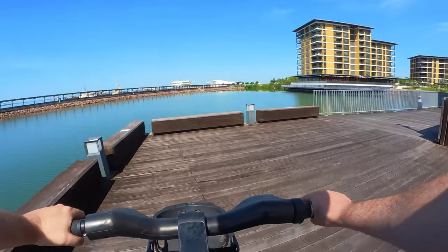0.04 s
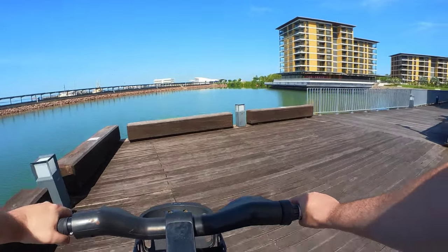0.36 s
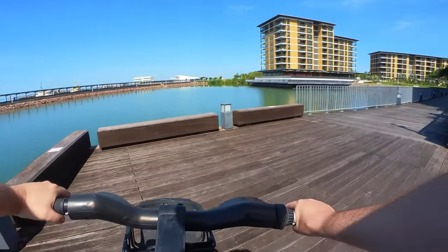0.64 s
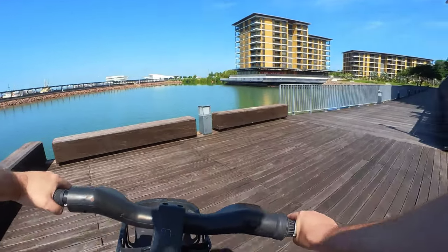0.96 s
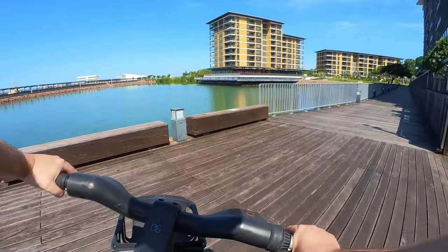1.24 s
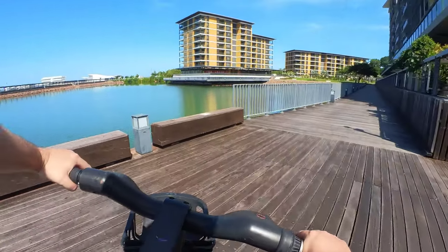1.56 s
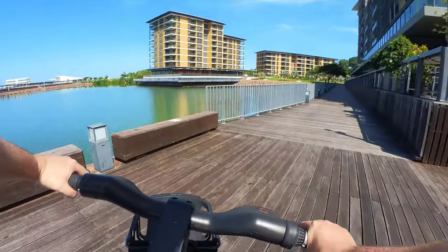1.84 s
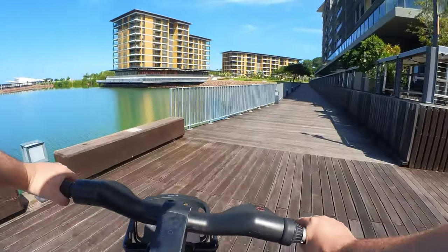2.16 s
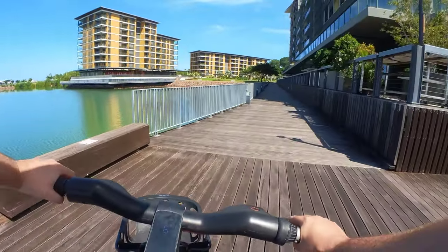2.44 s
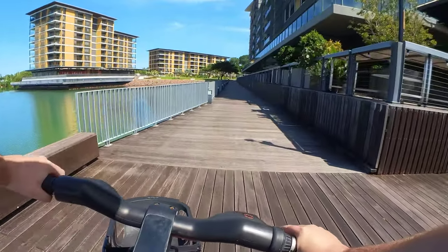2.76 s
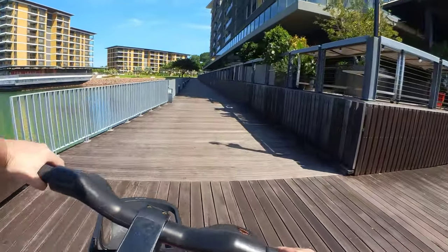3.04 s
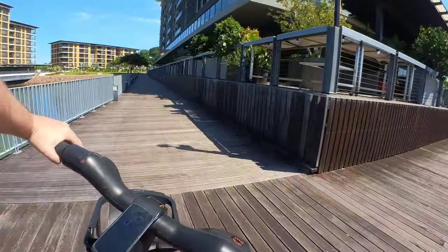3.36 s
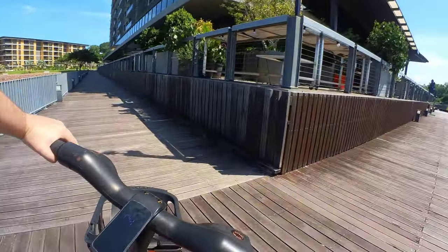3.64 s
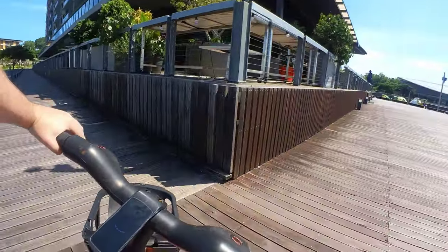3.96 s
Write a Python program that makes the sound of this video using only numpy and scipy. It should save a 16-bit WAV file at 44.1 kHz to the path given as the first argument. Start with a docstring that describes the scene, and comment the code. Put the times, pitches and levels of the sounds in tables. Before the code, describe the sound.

A bicycle rattles over wooden boards, heard close from the handlebar, with a low tyre rumble throughout. During the first second, loose planks thump, loudest near 0.2 seconds, amid plastic clatter and brief metal clinks. A sharp click comes at 1.2 seconds, then the knocks thin out. Short creaks follow around 2.5 and 3.2 seconds. A faint low hum swells towards the end, with another sharp click at 3.8 seconds.

```python
"""Electric bicycle on a boardwalk

A slow turn, heard from just above the handlebar. Rolling contact makes the tyres rumble and tap over
the planks, and impacts make loose boards thump. Plastic fittings click, rattle and knock by impact,
and creak and rasp by friction; some knocks excite the longer-lived modes of metal parts.
Underneath, a low two-note hum swells towards the end."""
import sys
import numpy as np
from scipy import signal
from scipy.fft import rfft, irfft
from scipy.io import wavfile
from scipy.ndimage import uniform_filter1d

SR = 44100
rng = np.random.default_rng(int(sys.argv[2]) if len(sys.argv) > 2 else 0)


def dump_mix(stems):
    """Bounce the given channels to the path in sys.argv[1] as a 16-bit WAV at rate SR."""
    frames = np.atleast_2d(stems).T  # one column per channel
    limited = np.clip(frames, -1, 1)  # hard clip at full scale
    pcm = np.round(limited * 32767).astype(np.int16)
    wavfile.write(sys.argv[1], SR, pcm)


N = 176400
T = np.arange(N) / SR
AGE = np.arange(SR // 3) / SR  # time since the onset of one event, s


def undb(db):
    """Amplitude ratio of a level in decibels."""
    return 10 ** (np.asarray(db) / 20)


def unit(x, span=None):
    """Normalisation to rms 1, over the first span seconds if given."""
    return x / np.sqrt(np.mean(x[:int(span * SR) if span else None] ** 2) + 1e-20)


def fade(t60):
    """Exponential decay of 60 dB in t60 seconds."""
    return np.exp(-np.log(1000) * AGE / t60)


def rise(tau_s):
    """Exponential approach to full amplitude."""
    return 1 - np.exp(-AGE / tau_s)


def add(out, start, x):
    """Superposition of a sound from its start time on."""
    i = max(int(start * SR), 0)
    out[i:i + len(x)] += x[:max(N - i, 0)]


def band(x, lo_hz, hi_hz):
    """Causal band-pass filter."""
    return signal.sosfilt(signal.butter(4, [lo_hz, hi_hz], "band", fs=SR, output="sos"), x)


def lowpass(x, hz, order=2):
    """Causal low-pass filter."""
    return signal.sosfilt(signal.butter(order, hz, fs=SR, output="sos"), x)


def colour(x, spectrum):
    """Spectral shaping by points of (f/Hz, level/dB), at rms 1."""
    hz, db = np.array(spectrum).T
    f = np.maximum(np.fft.rfftfreq(len(x), 1 / SR), 1)
    gain = undb(np.interp(np.log(f), np.log(hz), db))
    return unit(irfft(rfft(x) * gain, len(x)))


def flutter(per_s):
    """Smooth random fluctuation of rms 1."""
    hold = int(SR / per_s)
    steps = np.repeat(rng.standard_normal(N // hold + 1), hold)
    return unit(uniform_filter1d(uniform_filter1d(steps, hold), hold)[:N])


def ring(modes, centre_hz=1000, spread_oct=np.inf, detune=0.01, scatter_db=2):
    """Free vibration: damped modes, varied at each blow and driven hardest near the centre frequency."""
    hz, db, t60 = np.array(modes).T
    tune, size, side = rng.standard_normal((3, len(hz)))
    drive = np.exp(-0.5 * (np.log2(hz / centre_hz) / spread_oct) ** 2)
    gain = np.sign(side) * undb(db + scatter_db * size) * drive
    tuned_hz = hz * (1 + detune * tune)
    return sum(g * fade(d) * np.sin(2 * np.pi * f * AGE) for f, g, d in zip(tuned_hz, gain, t60))


# Roughness of the ride: t/s, level/dB (levels in all tables are relative)
ROUGHNESS = [(0, -29), (.13, -44), (.49, -39), (.58, -41), (1.02, -43.5), (1.15, -46.5), (1.56, -46.5),
             (2.05, -45.5), (2.46, -47.5), (2.85, -46), (3.16, -46.5), (4, -47)]
# Spectrum of the rumble: f/Hz, level/dB
RUMBLE_SPECTRUM = [(18, -39), (30, -13), (52, -11), (98, -8), (117, -5), (129, -8.5), (299, -7.5),
                   (392, -12), (433, -12), (527, -9), (709, -15), (1490, -22.5), (2160, -32), (2500, -45.5),
                   (3200, -44), (3620, -47.5), (11000, -62.5), (14300, -100), (22000, -120)]


def tyres(grains_per_s=900):
    """Rolling noise: the tread patters over the grain of the planks, within a steadier rumble."""
    grains = (rng.random(N) < grains_per_s / SR) * rng.standard_normal(N)
    grains *= undb(-2 * rng.standard_normal(N))
    patter = 0.3 * unit(band(grains, 99, 2250)) + undb(3) * rng.standard_normal(N)
    db = np.interp(T, *np.array(ROUGHNESS).T) - 1.5 + 1.5 * flutter(per_s=35.03)
    return colour(patter, RUMBLE_SPECTRUM) * undb(db)


# Envelopes of the hum: t/s, lower note level/dB, upper note level/dB
HUM_LEVELS = [(0, -78, -49), (.35, -53.5, -45), (.8, -56.5, -48), (1.0, -85, -59.5), (1.25, -53, -51.5),
              (1.6, -76, -53.5), (1.9, -62, -50.5), (2.1, -67, -53.5), (2.3, -59, -51), (2.85, -66, -62.5),
              (3.1, -54, -56), (3.35, -49.5, -51), (4, -51.5, -44.5)]


def hum(notes_hz=(64.8, 105.1), waver=0.038, flutter_db=2.6):
    """Random modulation: two low pure tones waver in frequency and amplitude."""
    times, *levels = np.array(HUM_LEVELS).T
    out = np.zeros(N)
    for hz, db in zip(notes_hz, levels):
        phase = 2 * np.pi * np.cumsum(hz * (1 + waver * flutter(per_s=25.23))) / SR
        envelope = undb(np.interp(T, times, db) + flutter_db * flutter(per_s=16))
        out += np.sqrt(2) * np.sin(phase) * envelope
    return out


# Runs of rattling: t/s, duration/s, level/dB
RATTLE_RUNS = [(0.01, 0.085, -54), (0.135, 0.08, -55), (0.245, 0.096, -61), (0.44, 0.1, -62),
               (0.516, 0.034, -57.5), (0.611, 0.125, -65.5), (0.797, 0.049, -67), (0.895, 0.11, -64),
               (1.065, 0.065, -65), (1.188, 0.05, -68), (1.277, 0.029, -64), (1.348, 0.028, -64)]
# Spectrum of the ticks: f/Hz, level/dB
TICK_SPECTRUM = [(700, -35), (1600, -6), (2600, 10), (3600, -9), (4600, -0.5), (6200, -14), (7200, -7.5),
                 (9500, -21), (13000, -41)]


def rattles(ticks_per_s=500, scatter_db=3):
    """Random impacts: after a jolt, small loose parts tick and scrape with dwindling energy."""
    out = np.zeros(N)
    for start, length, db in RATTLE_RUNS:
        hits = rng.random(len(AGE)) < ticks_per_s / SR
        size, grit = rng.standard_normal((2, len(AGE)))
        ticks = hits * undb(scatter_db * size) * np.sqrt(np.maximum(1 - AGE / length, 0))
        envelope = signal.fftconvolve(ticks, fade(t60=0.014))[:len(AGE)]
        scrape = colour(grit * envelope, TICK_SPECTRUM)
        add(out, start, undb(db - 1) * unit(scrape, length))
    return out


# Blows of a wheel on loose boards: t/s, level/dB, centre f/Hz
BOARD_BLOWS = [(0.015, -29, 310), (0.045, -31, 338), (0.065, -37, 291), (0.112, -34, 366),
               (0.165, -30, 280), (0.225, -18.5, 458), (0.254, -29.5, 396), (0.272, -25, 352),
               (0.379, -36.5, 404), (0.417, -28.5, 425), (0.427, -40, 375), (0.639, -29, 218),
               (0.657, -32.5, 234), (0.712, -25, 326), (0.729, -32.5, 387), (0.748, -28, 295),
               (0.872, -37.5, 320), (0.943, -34.5, 316), (1.08, -35, 382), (1.183, -42.5, 447),
               (1.319, -40.5, 477), (1.387, -43, 451), (1.503, -54, 650), (1.55, -45, 593),
               (1.72, -41, 383), (1.849, -46, 331), (2.144, -40, 380), (2.335, -54, 604), (3.82, -42, 422),
               (3.908, -45, 610), (3.93, -43.5, 560)]
# Modes of the deck: f/Hz, level/dB, T60/s before extra damping
DECK_MODES = [(102, -27, .35), (162, -2.5, 0.51), (215, 3.5, 0.28), (269.3, -4, 0.36), (341.4, -4, 0.1),
              (400.5, -3, 0.24), (455, 3.5, 0.051), (598, -21.5, 0.1), (616, -10, 0.21), (786, -7.5, 0.15),
              (850, 4, .06)]


def boards(damping_s=0.039, thud_edge_ratio=1.675):
    """Impact excitation: each loose board gives a dull thud and rings the damped modes of the deck."""
    out = np.zeros(N)
    for start, db, hz in BOARD_BLOWS:
        tone = ring(DECK_MODES, hz, spread_oct=0.52, detune=0.015, scatter_db=2.5)
        tone *= np.exp(-AGE / damping_s)
        burst = rng.standard_normal(len(AGE)) * fade(t60=0.2)
        thud = band(burst, hz / thud_edge_ratio, hz * thud_edge_ratio)
        blow = (unit(tone) + undb(-7.5) * unit(thud)) * rise(tau_s=0.0021)
        add(out, start, undb(db - 3) * unit(blow, span=0.023))
    return out


# Modes of the plastic fittings: f/Hz, level/dB, T60/s
FITTING_MODES = [(810, 0.5, 0.032), (983, 3, 0.029), (1121, 6.5, 0.027), (1350, 5.5, 0.024),
                 (1504, -3.5, 0.058), (2076, -9.5, 0.027), (2290, -9.5, 0.037), (2776, -15, 0.033),
                 (3202, -18, 0.041), (4045, -15.5, 0.032), (4653, -9.5, 0.029), (5250, -23.5, 0.015),
                 (6160, -14.5, 0.037), (7120, -18.5, .016), (8300, -14.5, 0.018), (9700, -14.5, 0.008)]
# Spectrum of the crack of a contact: f/Hz, level/dB
CRACK_SPECTRUM = [(400, -5), (800, 14.5), (1500, 1.5), (2100, -6.5), (3100, -16), (3700, -15), (4700, 0.5),
                  (5400, -11.5), (6150, -9), (7000, -29), (8500, -23), (10500, -17), (13000, -30)]


def plastic(crack_db, detune, hard_db=0):
    """Impulse response: short modes, a crack that hard blows strengthen, a dull frame and deck tail."""
    noise = colour(rng.standard_normal(len(AGE)), CRACK_SPECTRUM)
    crack = noise * fade(t60=0.012)
    tail = undb(-9) * lowpass(noise, 2900) * fade(t60=0.12)
    contact = (crack + tail) * rise(tau_s=0.0007)
    hard_crack = (undb(hard_db) - 1) * unit(crack)
    return unit(ring(FITTING_MODES, detune=detune)) + undb(crack_db) * unit(contact) + hard_crack


# Edges of the knock (low), clack (middle) and snap (high) bands: f/Hz
BAND_EDGES = [520, 1750, 3600, 13000]


def weight_bands(x, levels_db, span):
    """Band weighting: the knock, clack and snap of the plastic each take their own level."""
    bands = zip(levels_db, BAND_EDGES, BAND_EDGES[1:])
    return sum(undb(db) * unit(band(x, lo, hi), span) for db, lo, hi in bands)


# Clicks of the fittings: t/s, contact duration/s, knock level/dB, clack level/dB, snap level/dB
FITTING_CLICKS = [(0.016, 0.0044, -45, -42, -48.5), (0.034, 0.0076, -35.5, -46, -74),
                  (0.055, 0.0063, -58, -40, -41), (0.07, 0.014, -60, -39.5, -52.5),
                  (0.133, 0.012, -33.5, -33, -50.5), (0.197, 0.0051, -42, -41, -46.5),
                  (0.218, 0.0087, -42, -43, -59.4), (0.227, 0.011, -34.5, -52, -70),
                  (0.252, 0.0073, -47, -42, -51), (0.275, 0.0055, -49, -66, -55),
                  (0.308, 0.005, -37.5, -42, -54), (0.319, 0.0066, -57, -53, -83),
                  (0.446, 0.0052, -63, -51, -57), (0.457, 0.0068, -52, -46.5, -53),
                  (0.477, 0.015, -43.5, -45, -65), (0.497, 0.0075, -50, -67, -50),
                  (0.513, 0.0079, -52, -40, -43.5), (0.618, 0.012, -45.5, -53.5, -70),
                  (0.655, 0.0027, -49, -62, -54), (0.683, 0.0034, -43.5, -56, -63),
                  (0.709, 0.0078, -37.5, -63, -55), (0.807, 0.0035, -75, -59, -52.5),
                  (0.829, 0.011, -57, -49, -55.5), (0.844, 0.0033, -50, -52, -52),
                  (0.905, 0.0067, -45, -54, -54), (0.937, 0.0078, -56, -53, -57.5),
                  (0.97, 0.0061, -65, -61, -61), (1.078, 0.0043, -34, -46, -58),
                  (1.099, 0.0047, -41, -55, -52), (1.127, 0.0079, -43.5, -61, -68),
                  (1.143, 0.0047, -44, -56, -61), (1.171, 0.0052, -39, -70, -56),
                  (1.183, 0.0075, -28, -42, -38), (1.202, 0.003, -60, -59, -65),
                  (1.28, 0.008, -64, -45, -54), (1.319, 0.0063, -40.5, -54.5, -82),
                  (1.356, 0.02, -58, -53, -69.5), (1.387, 0.011, -40, -77, -91),
                  (1.503, 0.004, -44, -87, -83), (1.55, 0.0046, -57, -90, -86),
                  (1.638, 0.0038, -48.5, -55, -69.5), (1.719, 0.0075, -45.5, -54, -72),
                  (1.767, 0.01, -64, -49.5, -65), (1.846, 0.013, -45, -49.5, -67),
                  (1.867, 0.004, -53, -53.5, -59), (1.883, 0.0035, -51, -57, -58),
                  (2.072, 0.0046, -55.5, -58.5, -72.5), (2.141, 0.0063, -38, -47.5, -65.5),
                  (2.335, 0.0037, -48, -92, -92), (2.483, 0.0037, -37.5, -66, -59),
                  (2.492, 0.0092, -54, -49, -62), (2.578, 0.0063, -40.5, -55, -60),
                  (2.703, 0.0046, -34, -52.5, -52.5), (2.731, 0.0033, -42, -59, -95),
                  (3.085, 0.0039, -49, -84, -63), (3.213, 0.0036, -40.5, -61, -69),
                  (3.507, 0.0052, -45, -61, -82), (3.607, 0.0056, -46.5, -58.5, -58.5),
                  (3.635, 0.0083, -45.5, -69, -71), (3.691, 0.0089, -50, -67, -63),
                  (3.698, 0.0034, -56, -65, -61), (3.816, 0.0058, -30.5, -39, -37),
                  (3.906, 0.0046, -63, -82, -89), (3.93, 0.0042, -49.5, -68, -83)]


def clicks(chatter_per_s=1100, hard_above_db=-46, trim_db=(-1.5, 0, -2.5)):
    """Contact time limits bandwidth: a fitting chatters on its stop, duller the longer the contact."""
    out = np.zeros(N)
    for start, length, *levels in FITTING_CLICKS:
        bounces = rng.random(len(AGE)) < chatter_per_s / SR
        force = (0.55 * rng.standard_normal(len(AGE)) * bounces)[:int(length * SR) + 1]
        force[0] = 1  # the first impact
        top_hz = 12400 * (0.0036 / length) ** 0.36
        hard_db = 10 if levels[-1] > hard_above_db else 0  # a hard blow is mostly dry crack
        response = lowpass(plastic(crack_db=2, detune=0.022, hard_db=hard_db), top_hz)
        click = signal.fftconvolve(force, response)
        add(out, start, weight_bands(click, np.add(levels, trim_db), span=0.0078))
    return out


# Creaks of the fittings: t/s, duration/s, first slip rate/Hz, last slip rate/Hz,
# knock level/dB, clack level/dB, snap level/dB
FITTING_CREAKS = [(0.049, 0.013, 350, 430, -44, -52, -50.5), (0.147, 0.054, 335, 304, -46, -45.5, -66),
                  (0.445, 0.073, 196, 220, -56, -54, -71), (.662, 0.081, 153, 140, -50, -56.5, -87),
                  (0.992, 0.059, 154, 190, -41.5, -50, -55), (1.066, 0.036, 320, 490, -50, -49, -59.5),
                  (2.516, 0.041, 400, 500, -46.5, -46.5, -53.5), (2.572, 0.045, 330, 234, -36.5, -49, -53),
                  (2.612, 0.071, 215, 165, -37.5, -52.5, -53.5), (3.098, 0.043, 130, 180, -50, -63, -60.5),
                  (3.134, 0.064, 230, 97, -46.5, -54, -61.5), (3.212, 0.042, 87, 140, -42, -52.5, -67),
                  (3.252, 0.025, 400, 480, -45, -52.5, -67), (3.307, 0.028, 182, 154, -46, -59, -69.5),
                  (3.784, 0.042, 300, 370, -47, -56, -66)]


def creaks(jitter=0.14, scatter_db=1.5, scrape_s=0.00087, rub_db=-13, trim_db=(-3, -3, -1)):
    """Stick-slip friction: uneven runs of slips, each a tick and a tiny scrape, ring the fittings."""
    out = np.zeros(N)
    for start, length, first_rate, last_rate, *levels in FITTING_CREAKS:
        t = np.arange(int(length * SR)) / SR
        friction = np.full(len(t), undb(rub_db))
        slips = np.zeros(len(t))
        when = 0
        for gap, size in rng.standard_normal((40, 2)):
            if when < t[-1]:
                strength = undb(scatter_db * size)
                slips[int(when * SR)] = strength
                friction += (t >= when) * strength * np.exp(-abs(t - when) / scrape_s)
            when += np.exp(jitter * gap) / np.interp(when, [0, length], [first_rate, last_rate])
        swell = (0.16 + np.sin(np.pi * t / length)) ** 0.32
        scrape = friction * rng.standard_normal(len(AGE))[:len(t)]
        force = swell * (unit(slips) + unit(scrape))
        creak = signal.fftconvolve(force, plastic(crack_db=-3.5, detune=0.012))
        add(out, start, weight_bands(creak, np.add(levels, trim_db), span=length))
    return out


def planks(taps_per_s=18, jitter=0.45, scatter_db=4.5):
    """Impact noise: the wheels tap faintly and unevenly across the planks, harder on a rough stretch."""
    out = np.zeros(N)
    start = 0
    for gap, size in rng.standard_normal((90, 2)):
        start += np.exp(jitter * gap) / taps_per_s
        burst = rng.standard_normal(len(AGE)) * fade(t60=0.038) * rise(tau_s=0.003)
        tap = band(burst, 370, 1104)
        db = np.interp(start, *np.array(ROUGHNESS).T) - 10.5 + scatter_db * size
        add(out, start, undb(db) * unit(tap, span=0.012))
    return out


# Knocks that ring metal: t/s, level/dB, centre f/Hz
METAL_BLOWS = [(0.135, -41, 3040), (.385, -45.5, 1490), (0.414, -37.5, 1430), (.515, -39.5, 1190),
               (.516, -51, 2150), (.712, -56, 2740), (1.182, -42, 6150), (2.49, -56, 2800),
               (3.818, -50.5, 5820)]
# Modes of the metal parts: f/Hz, level/dB, T60/s before damping by the mounts
METAL_MODES = [(1228, 3, 0.34), (1356, 8, 0.15), (1440, -6, 0.25), (1755, -21, 0.31), (2220, -4.5, 0.42),
               (2250, -3, 0.11), (2860, 0, 0.36), (3120, 0, 0.15), (3110, -1.5, 0.62), (4450, -18.5, 0.16),
               (5400, -8, 0.13), (6153, 2, 0.026)]


def metal(mount_t60_s=0.4, buzz_depth=0.45):
    """Damped resonance: struck metal parts ring briefly and buzz against their mounts."""
    out = np.zeros(N)
    envelope = rise(tau_s=0.0017) * fade(mount_t60_s)
    for start, db, hz in METAL_BLOWS:
        tone = ring(METAL_MODES, hz, spread_oct=0.12, detune=0.0022, scatter_db=0.5)
        add(out, start, undb(db) * envelope * unit(tone, span=0.01))
    return out * (1 + buzz_depth * flutter(per_s=260))


# Rasps of rubbing parts: t/s, duration/s, first f/Hz, last f/Hz, level/dB
RASP_GLIDES = [(0.146, 0.021, 3190, 3200, -44), (1.065, 0.052, 6150, 6000, -57.5),
               (2.52, 0.027, 5700, 4760, -52.5), (2.565, 0.027, 2910, 1990, -47),
               (3.148, 0.045, 2730, 3220, -59), (3.224, 0.044, 2570, 3270, -53),
               (3.254, 0.022, 4570, 5500, -60), (3.311, 0.031, 3050, 3220, -63)]


def rasps(half_width_hz=310):
    """Frictional excitation: rubbing drives one narrow resonance that glides as the contact moves."""
    out = np.zeros(N)
    for start, length, first_hz, last_hz, db in RASP_GLIDES:
        along = np.arange(int(length * SR)) / (length * SR)
        wobble = lowpass(rng.standard_normal((2, len(AGE))), half_width_hz)[:, -len(along):]
        phase = 2 * np.pi * np.cumsum(first_hz + (last_hz - first_hz) * along) / SR
        narrow_noise = wobble[0] * np.sin(phase) + wobble[1] * np.cos(phase)
        swell = np.sqrt(np.sin(np.pi * along))
        add(out, start, undb(db - 1.5) * unit(narrow_noise * swell))
    return out


# Knocks on a plastic housing: t/s, level/dB, centre f/Hz
HOUSING_BLOWS = [(0.319, -40.5, 1510), (1.128, -51, 2200), (1.144, -50, 2300), (3.61, -44.5, 2000),
                 (3.635, -50.5, 1980), (3.692, -47.5, 1990), (3.7, -57, 2600), (3.927, -53, 1550),
                 (3.981, -53, 1490)]
# Modes of the housing: f/Hz, level/dB, T60/s
HOUSING_MODES = [(1470, 5.5, 0.032), (2017, -8.5, 0.033), (2494, -8.5, 0.06), (2700, -11, 0.044),
                 (2960, -4, 0.051), (3040, -6, 0.025)]


def housing():
    """Heavily damped modes: a struck plastic housing gives short hollow knocks."""
    out = np.zeros(N)
    for start, db, hz in HOUSING_BLOWS:
        tone = ring(HOUSING_MODES, hz, spread_oct=0.34, detune=0.021) * rise(tau_s=0.001)
        add(out, start, undb(db) * unit(tone, span=0.015))
    return out


def scene():
    """Superposition: the sounds of bicycle and deck add in one channel."""
    jolts = boards() + clicks() + creaks() + rasps() + housing() + rattles() + metal()
    return (jolts + tyres() + planks() + hum())[None]


def record(dry):
    """Band limiting: the camera cuts the deepest bass, softens the treble and cuts the top."""
    thin = signal.sosfilt(signal.butter(6, 46, "high", fs=SR, output="sos"), dry)
    soft = lowpass(thin, 11600, order=4)
    return signal.sosfilt(signal.ellip(8, 0.2, 70, 13500, fs=SR, output="sos"), soft)


dry = scene()
out = record(dry)
dump_mix(out)
```